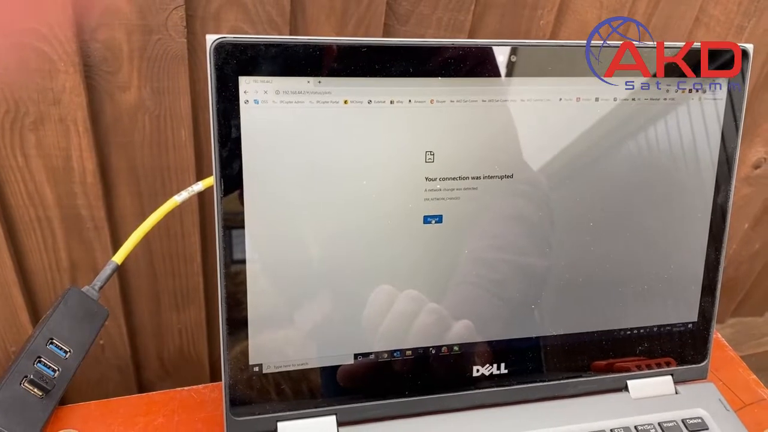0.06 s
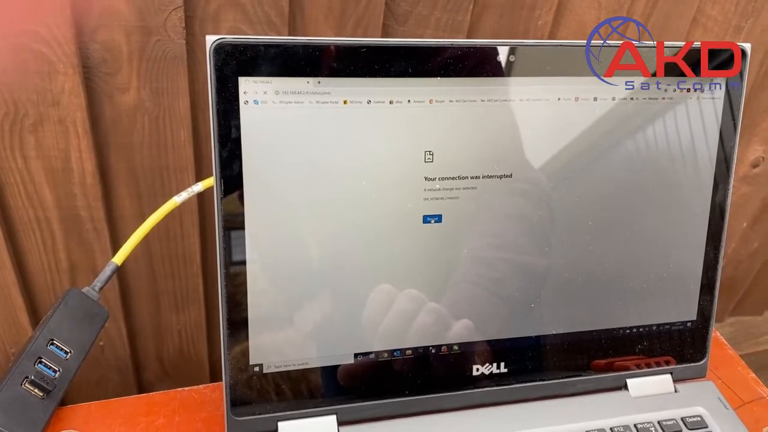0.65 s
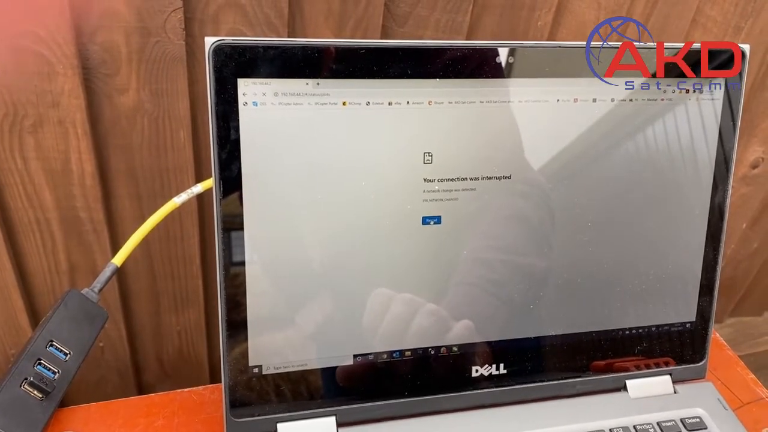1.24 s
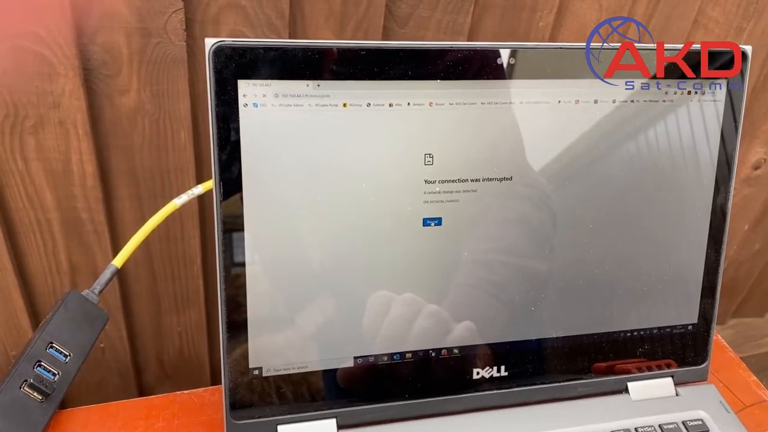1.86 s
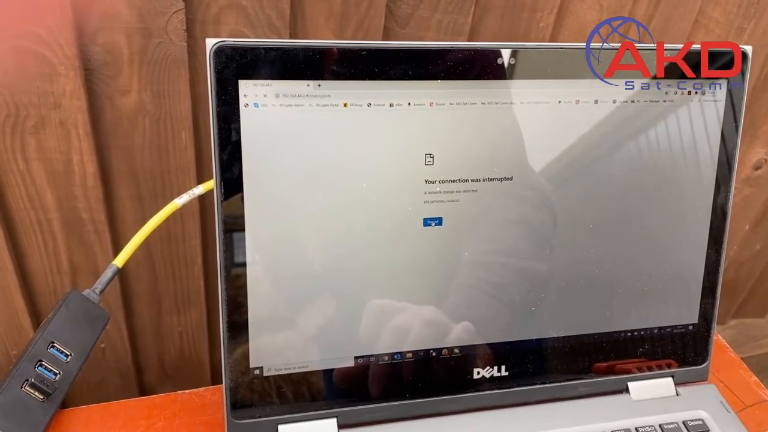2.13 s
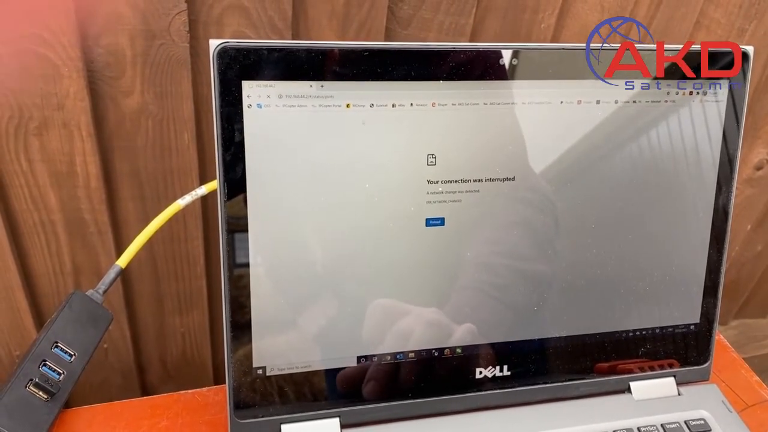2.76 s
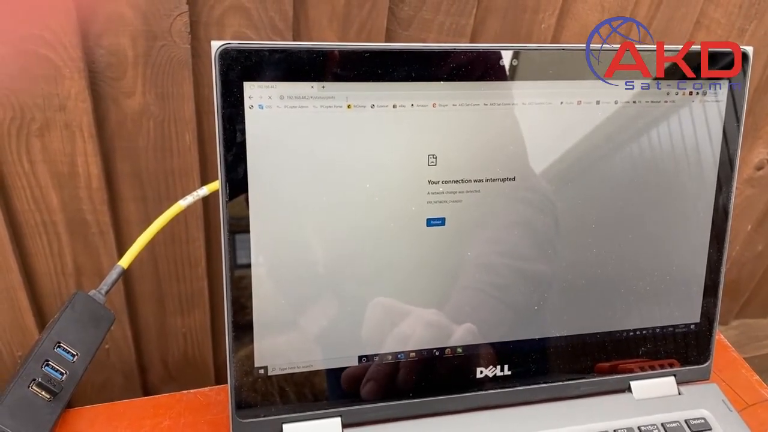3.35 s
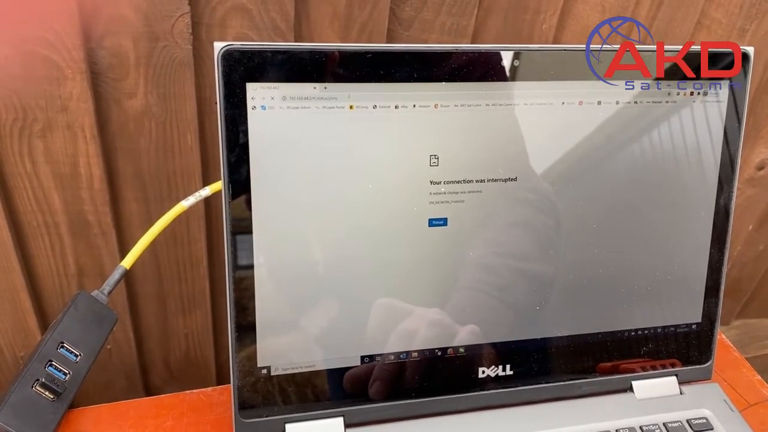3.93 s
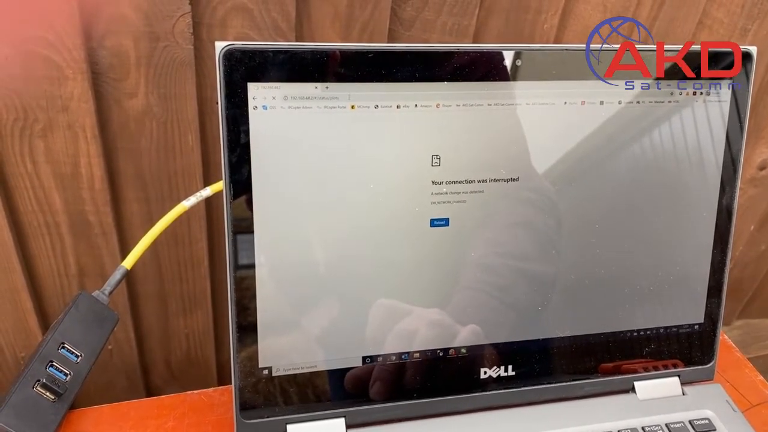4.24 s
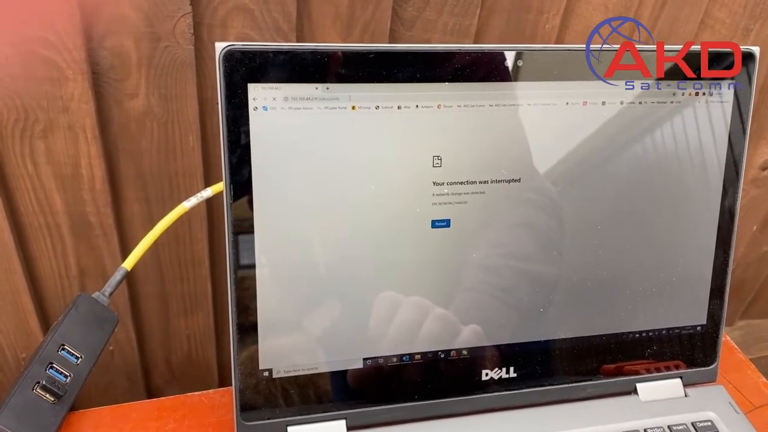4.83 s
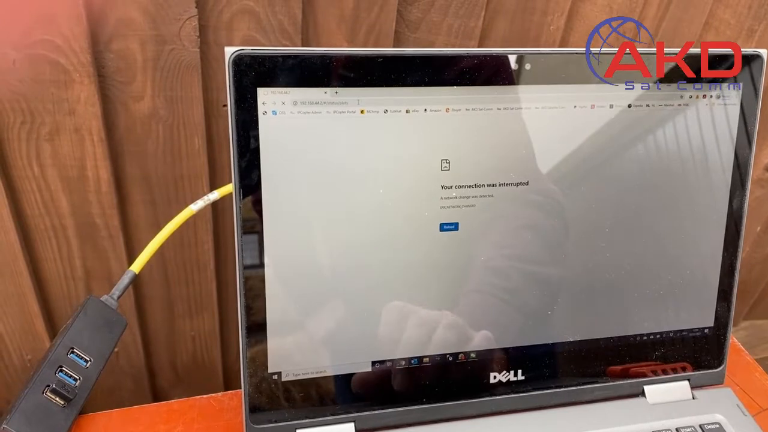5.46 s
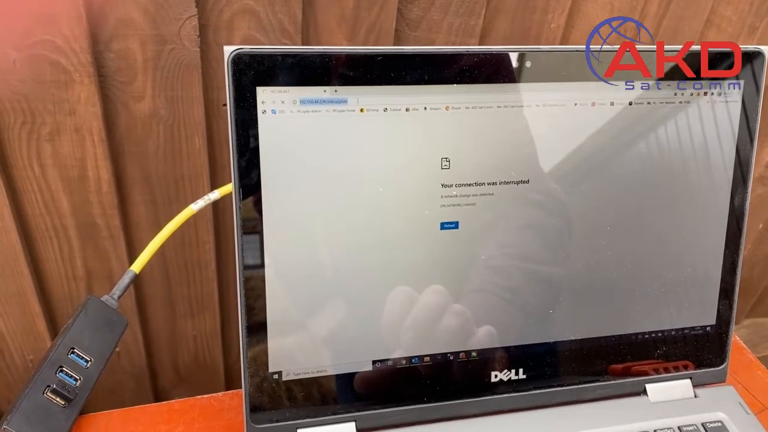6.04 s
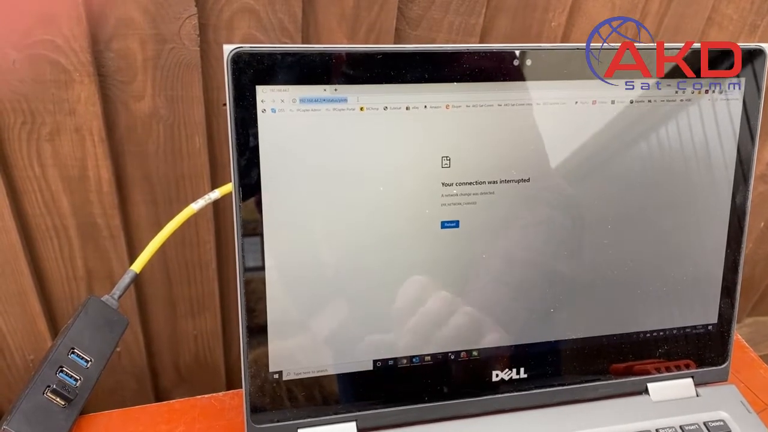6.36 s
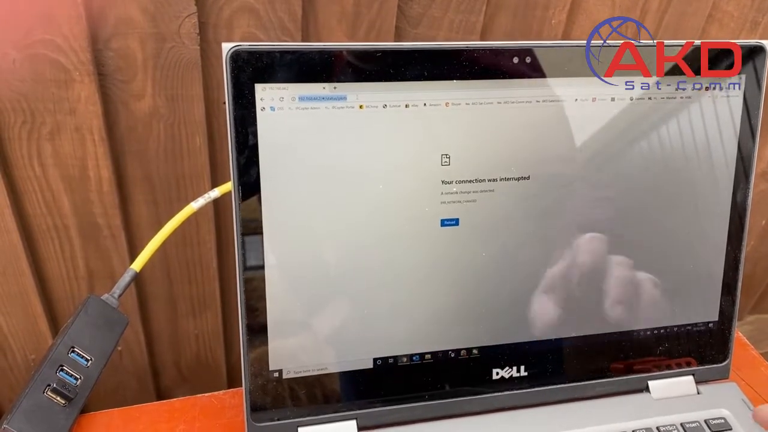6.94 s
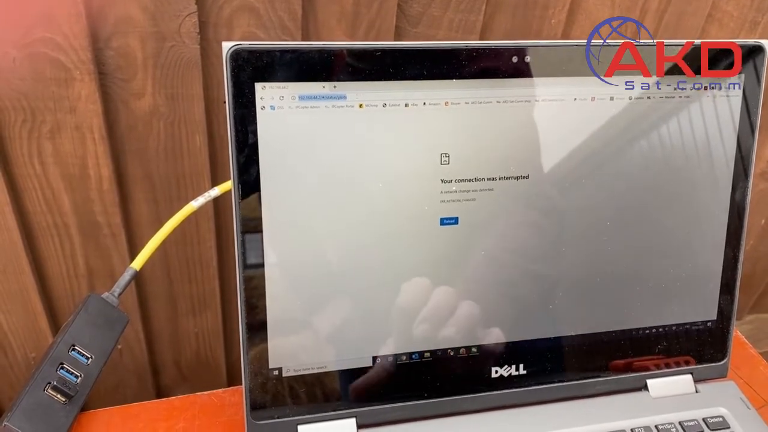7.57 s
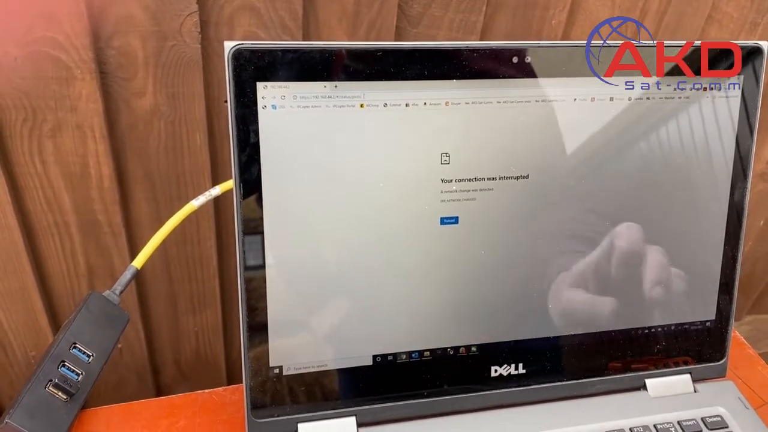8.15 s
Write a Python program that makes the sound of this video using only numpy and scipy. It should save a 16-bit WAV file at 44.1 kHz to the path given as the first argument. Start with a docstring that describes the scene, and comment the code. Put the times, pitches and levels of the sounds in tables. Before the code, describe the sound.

Soft, low bumps on the microphone open a quiet outdoor scene of faint birdsong and far-off road noise. A distant engine hum grows louder around the middle, sinking very slightly in pitch. After a few faint single ticks, a nearby laptop clicks sharply in three short bursts, each click ringing its plastic case. Small birds keep chirping throughout, ending with a couple of swooping whistles.

```python
"""A garden: distant traffic murmurs throughout, and far birds twitter in echoing trees.
First a hand bumps the microphone, a small bird whistles its song and another gives a short low call.
Near 3 s a third bird adds scooped whistles; then a far engine's drone swells, slowly sinking in pitch.
At 5 s the song comes again. Close by, after a few faint single clicks, a laptop's touchpad and buttons
click in three quick runs from 5.6 s, each snap ringing the plastic shell. More scoops end the scene."""
import sys
import numpy as np
from scipy import signal
from scipy.fft import rfft, irfft, next_fast_len
from scipy.io import wavfile
from scipy.ndimage import uniform_filter1d, map_coordinates

SR = 44100
rng = np.random.default_rng(int(sys.argv[2]) if len(sys.argv) > 2 else 0)


def file_out(sig):
    """Save sig as 16-bit WAV at sys.argv[1]."""
    # one column per channel
    cols = np.atleast_2d(sig).T
    # limit, then scale
    lim = np.clip(cols, -1, 1)
    pcm = np.round(lim * 32767).astype(np.int16)
    wavfile.write(sys.argv[1], SR, pcm)


N = 361619


def amp(db):
    """Turn decibels (dB) into a number to multiply a sound by."""
    return 10 ** (np.asarray(db) / 20)


def unit(x):
    """Scale a sound to an average strength (rms) of 1."""
    return x / np.sqrt(np.mean(x ** 2) + 1e-20)


def along(points, hz):
    """Read between the rows of a (Hz, value) table, with octaves evenly spaced."""
    freqs, values = np.transpose(points)
    return np.interp(np.log(hz + 1), np.log(freqs + 1), values)


def curves(rows):
    """Give each column after the time one value per sample."""
    times, *columns = np.transpose(rows)
    return [np.interp(np.arange(N) / SR, times, column) for column in columns]


def wobble(rate, size=N):
    """A smooth curve through `rate` random values a second."""
    knots = rng.standard_normal(int(size * rate / SR) + 4)
    return map_coordinates(knots, [np.arange(size) * rate / SR])


def filtered(x, response):
    """Multiply each frequency in a sound by response(Hz)."""
    n = x.shape[-1]
    padded = next_fast_len(n + 8192)
    return irfft(rfft(x, padded) * response(np.fft.rfftfreq(padded, 1 / SR)), padded)[..., :n]


def add(track, start, sound):
    """Mix a sound into the track, `start` seconds in."""
    part = track[..., max(round(start * SR), 0):][..., :sound.shape[-1]]
    part += sound[..., :part.shape[-1]]


def pan(sound, db):
    """Turn the left side up and the right side down by db."""
    return sound * amp([[db], [-db]])


def echo_tail(t60):
    """A stereo echo made of dying noise; t60 is the seconds it takes to fade by 60 dB."""
    t = np.arange(SR * 2 // 3) / SR
    tail = rng.standard_normal((2, len(t))) * amp(-60 * t / t60)
    return tail / np.linalg.norm(tail, axis=1, keepdims=True)


def swish(peak_s, half_length, db, centre_hz, octaves):
    """One band of noise that swells and fades."""
    out, t = np.zeros((2, N)), np.arange(-4 * half_length, 4 * half_length, 1 / SR)
    bell = lambda hz: np.exp(-.5 * (np.log2((hz + 1) / centre_hz) / octaves) ** 2)
    band = filtered(rng.standard_normal((2, len(t))), bell)
    add(out, peak_s + t[0], amp(db) * np.exp(-.5 * (t / half_length) ** 2) * unit(band))
    return out


# How alike left and right sound. Each row: frequency in Hz, likeness (1 means the same).
EAR_LIKENESS = [(60, 0.79), (130, .94), (290, .65), (640, 0.37), (1400, 0.34), (3100, 0.14), (12000, 0.079)]
def rush(spectrum, patchy_db):
    """Wide stereo noise with randomly louder and softer patches."""
    cells = signal.stft(rng.standard_normal((2, N)), nperseg=512)[2]
    patches = uniform_filter1d(rng.standard_normal(cells.shape[1:]), size=4, axis=0)  # blur in pitch
    patches = uniform_filter1d(patches, size=16, axis=1)  # blur in time
    pair = signal.istft(cells * amp(patchy_db * unit(patches)))[1][:, :N]
    width = lambda hz: np.arccos(np.clip(along(EAR_LIKENESS, hz), -1, 1)) / 2
    colour = lambda hz: amp(along(spectrum, hz)) * [np.cos(width(hz)), np.sin(width(hz))]
    mid, side = filtered(pair, colour)
    return unit(np.array([mid + side, mid - side]))


def from_left(pair, lag_s=.00043):
    """Sound from the left reaches the microphone's right side a little later."""
    return filtered(pair, lambda hz: np.exp(-2j * np.pi * np.outer([0, lag_s], hz)))


# The tone of the three road noises. Each row: frequency in Hz, relative level in dB.
RUMBLE_TONE = [(15, -20), (28, -13.5), (42, -7.5), (56, 1.5), (72, -4.5), (100, -7), (140, -15), (200, -23),
               (400, -59), (900, -120)]
MURMUR_TONE = [(60, -32.5), (130, 3.5), (190, 1), (270, 2.5), (350, -5), (500, -4), (750, -3.5), (1000, -9),
               (1600, -22.5), (3000, -38.5), (8000, -76.5)]
TYRE_TONE = [(400, -30), (900, 1.5), (1300, 5.5), (1600, -1), (2000, -11.5), (2700, -18), (3700, -18),
             (5000, -23.5), (7000, -27), (8500, -32.5), (11500, -30), (13000, -41), (16000, -48.5)]
# How the rumble rises and falls. Each row: time in seconds, relative level in dB.
RUMBLE_LEVELS = [(0.5, -59), (0.71, -63), (1.12, -57), (2.38, -60), (2.9, -53.5), (3.14, -57),
                 (7.81, -59.5), (8.2, -54.5)]
# The same for the other two. Each row: time in seconds, murmur in dB, tyre hiss in dB.
MURMUR_AND_TYRE_LEVELS = [(0.0, -66, -70), (0.89, -66.5, -73), (2.4, -63.5, -72.5), (4.59, -66, -72),
                          (5.87, -64, -70), (6.32, -61.5, -69), (6.65, -64, -71), (8.2, -63.5, -70.5)]
def traffic():
    """Distant roads off to the left: a low rumble, a murmur, hissing tyres and a brief faint whine."""
    (rumble_db,), (murmur_db, tyre_db) = curves(RUMBLE_LEVELS), curves(MURMUR_AND_TYRE_LEVELS)
    rumble = amp(rumble_db + 5) * rush(RUMBLE_TONE, patchy_db=.5)
    murmur = amp(murmur_db + 5) * rush(MURMUR_TONE, patchy_db=1.6)
    tyres = amp(tyre_db + 4.5) * rush(TYRE_TONE, patchy_db=2)
    whine = swish(peak_s=5.77, half_length=.37, db=-66.5, centre_hz=1264, octaves=.05)
    return pan(rumble, .5) + pan(from_left(murmur + tyres), .4) + whine


# The engine's lowest tone and the octave above. Each row: time in seconds, relative level in dB.
HUM_LEVELS = [(1.41, -59.5), (2.05, -46), (2.39, -55), (3.3, -50), (3.91, -39.5), (4.3, -42.5), (4.53, -37),
              (5.02, -38.5), (5.46, -46), (5.55, -40.5), (5.83, -49), (6.04, -42), (6.36, -39.5),
              (6.5, -45.5), (7.06, -44), (7.12, -48), (7.8, -41), (8.2, -43.5)]
OCTAVE_LEVELS = [(0.3, -67), (0.36, -75), (1.86, -61.5), (2.1, -73), (2.26, -65), (3.42, -65),
                 (3.55, -57.5), (4.37, -69), (4.44, -61), (7.27, -71.5), (7.32, -67), (8.2, -71)]
def engine(start_hz=102.3, sink_hz_per_s=.775):
    """A slowing engine. Only its two lowest tones carry this far, fading in and out on the way."""
    (hum_db,), (octave_db,) = curves(HUM_LEVELS), curves(OCTAVE_LEVELS)
    pitch = start_hz - sink_hz_per_s * np.arange(N) / SR
    phase = 2 * np.pi * np.cumsum(pitch + .3 * wobble(6)) / SR
    hum = amp(hum_db + .66 * wobble(14)) * np.sin(phase)
    octave = amp(octave_db - .9 + 1.6 * wobble(7.3)) * np.sin(2 * phase + .15 * wobble(11))
    return pan(np.sqrt(2) * (hum + octave), .98)


def arc(length, path_hz):
    """A pitch glide that curves through a start, a middle and an end."""
    return np.polyval(np.polyfit([0, .5, 1], path_hz, 2), np.linspace(0, 1, int(length * SR)))


def whistle(glide, depth_hz, trill_hz=170, flutter_db=3):
    """One bird note: a pure tone follows a glide, shaken by a trill (a fast wiggle in pitch)."""
    n = len(glide)
    trill = np.sin(2 * np.pi * np.cumsum(trill_hz * (1 + .25 * wobble(60, n))) / SR)
    pitch = glide + depth_hz * (.75 * trill + .6 * wobble(300, n))
    swell = np.sqrt(np.abs(np.sin(np.pi * np.linspace(0, 1, n))))
    flutter = amp(flutter_db * wobble(90, n))
    return unit(swell * flutter * np.sin(2 * np.pi * np.cumsum(pitch) / SR))


# How long the trees echo. Each row: frequency in Hz, seconds to fade by 60 dB.
TREE_FADES = [(2000, .8), (5000, .75), (9000, .5)]
def tree_echo(hz):
    """The echo of the trees, shorter for higher notes."""
    return echo_tail(along(TREE_FADES, hz))


# Birds deep in the trees. Each row: time in seconds, relative level in dB.
FAR_BIRD_LEVELS = [(0.0, -82), (0.66, -76), (2.08, -90), (2.74, -89), (2.88, -82), (4.0, -93),
                   (4.77, -81.5), (6.26, -81.5), (6.42, -79), (7.28, -90), (7.67, -82.5), (8.2, -89.5)]
def far_birds(centre_hz=4200, spread=.33, count=110):
    """Far birds twitter at random; only their echo gets through."""
    calls = np.zeros(N)
    for k, (when, length, height) in enumerate(rng.random((count, 3))):
        path_hz = centre_hz * np.exp(spread * (2 * height - 1) + .06 * rng.standard_normal(3))
        glide = arc(.05 + .08 * length, path_hz)
        add(calls, (k + when) / count * N / SR, whistle(glide, depth_hz=160))
    echo = signal.fftconvolve(calls[None], tree_echo(centre_hz), axes=1)[:, :N]
    level_db, = curves(FAR_BIRD_LEVELS)
    return amp(level_db - 1) * unit(echo)


def phrase(notes, start, level_db, pitch_ratio=1):
    """A bird's learnt tune, sung once, as notes of (start, glide, trill depth, level)."""
    return [(start + offset, pitch_ratio * arc(length, path_hz), depth_hz, level_db + db)
            for offset, length, *path_hz, depth_hz, db in notes]


# The notes of the song and of the low call. Each row: seconds into the tune, length in seconds,
# start, middle and end pitch in Hz, trill depth in Hz, relative level in dB.
SONG_NOTES = [(0, .065, 4940, 4550, 4260, 130, -75), (.095, .055, 5730, 5800, 5250, 100, -69),
              (.143, .037, 4960, 4220, 4200, 62, -72), (.173, .041, 4300, 4600, 4490, 55, -68.5),
              (.215, 0.065, 5040, 5110, 5110, 200, -69.5), (.555, .065, 7370, 6430, 5700, 520, -74),
              (.637, .085, 5220, 4984, 4790, 230, -71), (.778, .076, 3750, 3460, 2900, 95, -77),
              (.87, .088, 5770, 5705, 5770, 15, -85), (.935, .033, 5160, 5135, 5070, 80, -72.5),
              (.95, .125, 5700, 5745, 5610, 22, -67.5), (1.066, .037, 5680, 5485, 5300, 65, -73),
              (1.325, .14, 6750, 6600, 6750, 680, -75.5), (1.65, .045, 7300, 6950, 6400, 320, -77),
              (1.688, .055, 6250, 5750, 5380, 260, -68), (1.79, .05, 5500, 5180, 4970, 170, -73),
              (1.878, .042, 5390, 5180, 4810, 160, -71.5)]
LOW_CALL_NOTES = [(0, .052, 2404, 2604, 2720, 110, -79), (.08, .042, 3780, 3985, 4270, 150, -76.5),
                  (.1, .036, 2950, 3100, 3100, 90, -82), (.174, .042, 3894, 3660, 3600, 100, -75)]
# When the song is sung. Each row: start in seconds, level change in dB.
SONG_STARTS = [(.542, .5), (5.054, -0.7)]
# When the low call comes. Each row: start in seconds, level change in dB, pitch multiplier.
LOW_CALL_STARTS = [(1.077, 1, 1.02), (4.575, -1.5, 1.01), (4.72, -3.5, 1.02), (6.8, -0.5, .97),
                   (7.466, 2, 0.97)]
def song_and_answer():
    """One bird sings twice; another answers with three quick rises and a settling note."""
    songs = [note for row in SONG_STARTS for note in phrase(SONG_NOTES, *row)]
    answers = [note for row in LOW_CALL_STARTS for note in phrase(LOW_CALL_NOTES, *row)]
    return songs + answers


# Scooped whistles. Each row: time of the lowest point, fall time, rise time and roundness of the turn,
# all in seconds, then lowest pitch in Hz, relative level in dB.
SCOOP_NOTES = [(2.772, 0.047, 0.15, .05, 4370, -79), (3.075, .06, 0.098, 0.093, 4666, -73),
               (7.755, .025, .105, .03, 4640, -82.5), (8.02, 0.064, 0.089, 0.019, 5460, -76.5)]
def scoops(slope_hz_per_s=21000, trill_depth_hz=40, rasp=.2):
    """Notes that dive, turn smoothly and climb again; the higher, the raspier."""
    for bottom_s, fall, rise, turn, bottom_hz, db in SCOOP_NOTES:
        climb_hz = slope_hz_per_s * (np.hypot(np.arange(-fall, rise, 1 / SR), turn) - turn)
        yield bottom_s - fall, bottom_hz + climb_hz, trill_depth_hz + rasp * climb_hz, db


# Single calls of other birds. Each row: start in seconds, length in seconds, middle pitch in Hz,
# slide in Hz, trill depth in Hz, relative level in dB.
CHIRP_NOTES = [(0.119, 0.11, 3235, -430, 240, -79), (0.209, .083, 7300, -350, 40, -83.5),
               (0.358, 0.058, 4300, -600, 360, -75), (.376, .087, 7330, -780, 120, -85.5),
               (.526, .1, 7190, -600, 87, -82.5), (0.987, 0.093, 3990, 100, 200, -77.5),
               (1.967, .054, 7280, 172, 140, -82), (2.99, .04, 5700, -1400, 190, -83),
               (2.756, 0.049, 3420, -120, 80, -78.5), (2.799, .2, 3300, -200, 450, -82),
               (3.102, 0.3, 3020, -100, 96, -85.5), (3.615, .34, 2980, 40, 95, -82),
               (3.776, .033, 6360, 90, 20, -76.5), (3.773, 0.03, 5120, 129, 70, -80.5),
               (4.152, .2, 4130, -71, 130, -84.5), (4.41, 0.046, 5340, -800, 200, -84),
               (4.43, .16, 2810, 103.5, 200, -83), (4.659, .07, 6960, 402, 300, -85),
               (4.741, .17, 4900, -700, 480, -83), (6.257, .18, 3647, 79, 480, -70.5),
               (6.456, .2, 3730, 140.5, 350, -81), (7.181, 0.064, 5760, 1099, 420, -75),
               (7.235, 0.051, 6500, 178, 40, -82), (7.332, 0.24, 3450, 761, 140, -83),
               (7.588, .024, 5940, -570, 280, -78)]
def chirps():
    """Notes that slide evenly up or down."""
    for start, length, pitch_hz, slide_hz, depth_hz, db in CHIRP_NOTES:
        yield start, pitch_hz + slide_hz * np.linspace(-.5, .5, int(length * SR)), depth_hz, db


def near_birds(gain_db=1.33, direct_db=-4.5, echo_db=-5):
    """Each note arrives directly, with a short echo off the near fence and a long one from the trees."""
    out = np.zeros((2, N))
    for start, glide, depth_hz, db in [*song_and_answer(), *scoops(), *chirps()]:
        note = amp(db + gain_db) * whistle(glide, depth_hz)
        fence_echo = echo_tail(t60=.2)
        echoes = amp(echo_db) * (fence_echo + tree_echo(glide.mean()))
        add(out, start, amp(direct_db) * note)
        add(out, start, signal.fftconvolve(note[None], echoes, axes=1))
    return pan(out, 1.24)


# Soft bumps. Each row: peak time in seconds, level in dB, pitch in Hz, half length in seconds.
HAND_BUMPS = [(0.345, -34, 67, 0.022), (0.409, -44, 59.6, 0.015), (1.203, -47, 72, .02),
              (1.504, -44, 62, .015), (8.16, -49, 45, .04)]
def bumps():
    """The hand holding the microphone shifts, making a few soft, deep vibrations."""
    t = np.arange(N) / SR
    return sum(amp(db) * np.exp(-((t - peak) / half_length) ** 2) * np.cos(2 * np.pi * hz * (t - peak))
               for peak, db, hz, half_length in HAND_BUMPS)


# Light rubs. Each row: peak time in seconds, half length in seconds, level in dB,
# centre frequency in Hz, width in octaves.
BRUSH_STROKES = [(6.36, 0.05, -70.5, 2900, 1.3), (6.393, 0.0087, -59.5, 7600, 0.86),
                 (6.37, 0.17, -61.5, 410, 0.42), (2.55, 0.21, -68.5, 470, 0.65)]
def brushes():
    """Fingers and sleeve brush the laptop with a soft swish."""
    return sum(swish(*row) for row in BRUSH_STROKES)


# The tone of the switch's snap and the case's knock. Each row: frequency in Hz, relative level in dB.
SNAP_TONE = [(350, -20), (800, -10), (1500, 1), (2800, -12), (3500, -6), (5000, -14.5), (7500, -21.5),
             (9400, -25), (11000, -20), (12500, -26.5), (13200, -36), (15500, -34.5)]
KNOCK_TONE = [(60, -16.5), (150, 11), (300, -9), (700, -11), (1200, -44), (3000, -64.5)]
# The shell's ringing tones. Each row: pitch in Hz, relative level in dB, seconds to fade by 60 dB.
SHELL_TONES = [(1327, -5, 0.022), (1576, -4, .02), (2377, -17, 0.03), (3420, -24.5, 0.037),
               (4030, -14, 0.02), (4810, -12.5, .018), (6320, -19.5, 0.012)]
# The clicks. Each row: start in seconds, relative level in dB, treble boost in dB per octave,
# relative knock level in dB, seconds for the snap to fade by 60 dB.
LAPTOP_CLICKS = [(0.237, -63, 7, -37, 0.025), (2.239, -56.5, -3.5, -16, 0.033),
                 (3.731, -57.5, 4, -27.5, 0.017), (4.504, -55, -4.5, -25, 0.03),
                 (5.565, -40.5, -7, -5.5, 0.017), (5.6015, -27.5, 0.5, -17, 0.013),
                 (5.6984, -35, -2, -7, 0.035), (6.294, -50.5, 5, -20, 0.015), (6.3177, -44, 6, -23, 0.021),
                 (6.344, -45, -7, -25, 0.031), (6.395, -47, 0.5, -13, 0.058),
                 (7.4669, -39, -2.5, -14, 0.022), (7.5494, -34, -1.5, -11, 0.016),
                 (7.679, -46, -3.5, -11, 0.028)]
def clicks(snap_db=-3.7, ring_db=-4.7, rise_s=.00035, fence_db=-17, fence_delay_s=.0043, width=.72):
    """A switch snaps, rings the plastic shell and knocks the case; the fence echoes faintly."""
    out, t = np.zeros((2, N)), np.arange(SR // 8) / SR
    fade = lambda t60: amp(-60 * t / t60)
    attack = 1 - np.exp(-t / rise_s)

    def noise(colour):
        """The laptop is straight ahead, so left and right share most of their noise."""
        pair = rng.standard_normal(len(t)) + width * rng.standard_normal((2, len(t)))
        return unit(filtered(pair, colour))

    for start, db, tilt_db, knock_db, snap_t60 in LAPTOP_CLICKS:
        tilt = lambda hz: amp(tilt_db * np.log2(np.clip(hz, 1000, 9000) / 2000))
        snap = noise(lambda hz: amp(along(SNAP_TONE, hz)) * tilt(hz)) * fade(snap_t60)
        ring = 0
        for tone_hz, tone_db, tone_t60 in SHELL_TONES:
            phase = 2 * np.pi * (tone_hz * t + rng.random()) + width * rng.standard_normal((2, 1))
            ring += amp(tone_db) * tilt(tone_hz) * fade(tone_t60) * np.sin(phase)
        knock = noise(lambda hz: amp(along(KNOCK_TONE, hz))) * fade(t60=.084)
        click = amp(db) * attack * (amp(snap_db) * snap + amp(ring_db) * ring + amp(knock_db) * knock)
        fence_echo = signal.fftconvolve(click, echo_tail(t60=.14), axes=1)
        add(out, start, click)
        add(out, start + fence_delay_s, amp(fence_db) * fence_echo)
    return pan(out, .5)


def scene():
    """Everything heard in the garden, added together."""
    return brushes() + near_birds() + far_birds() + engine() + traffic() + clicks() + bumps()


def record(dry):
    """The recorder cuts off the very highest treble."""
    top_hz = 15900
    return signal.sosfilt(signal.ellip(10, .1, 80, top_hz, fs=SR, output="sos"), dry)


dry = scene()
out = record(dry)
file_out(out)
```